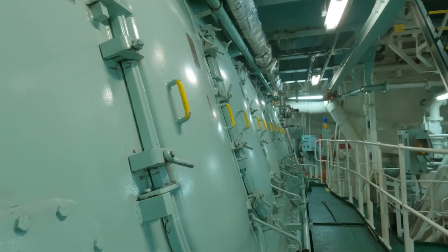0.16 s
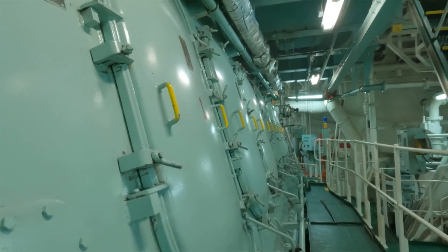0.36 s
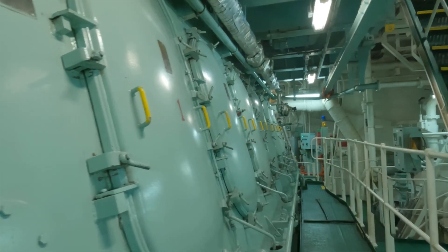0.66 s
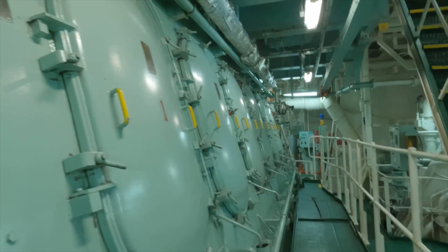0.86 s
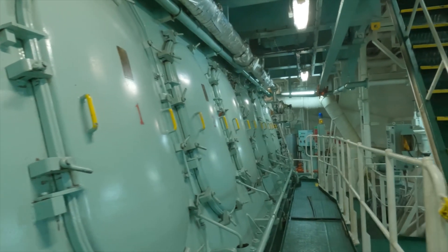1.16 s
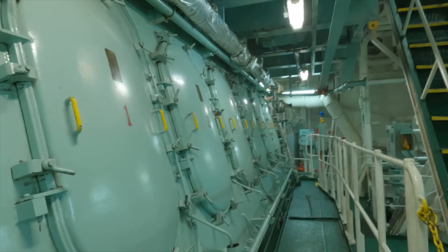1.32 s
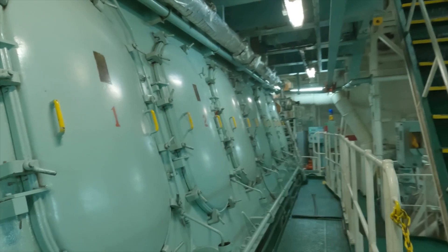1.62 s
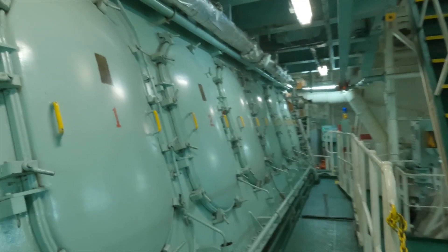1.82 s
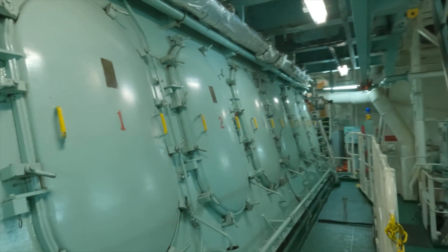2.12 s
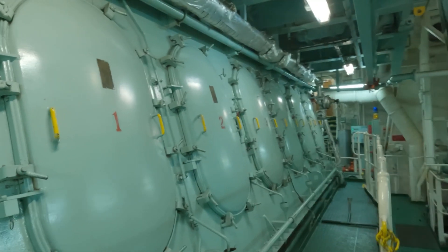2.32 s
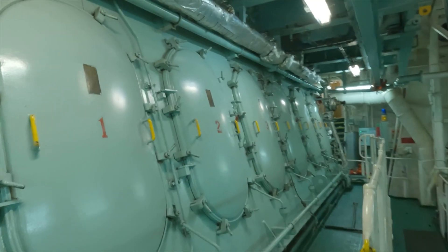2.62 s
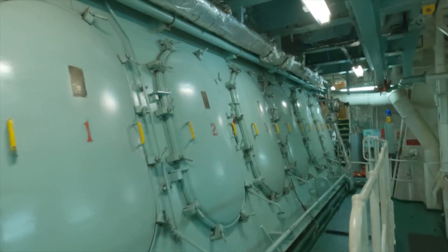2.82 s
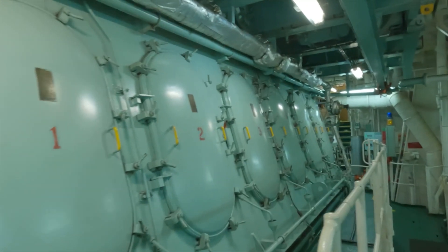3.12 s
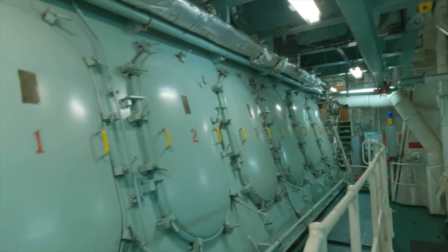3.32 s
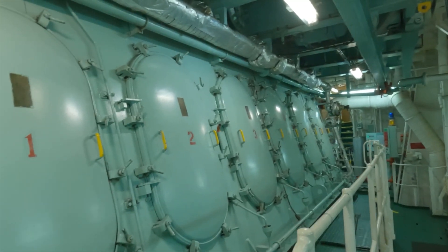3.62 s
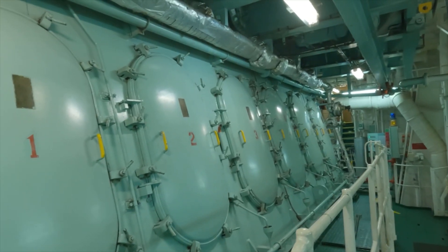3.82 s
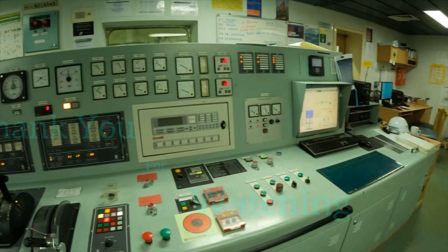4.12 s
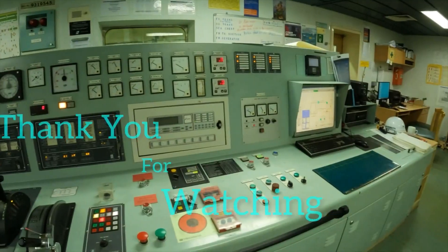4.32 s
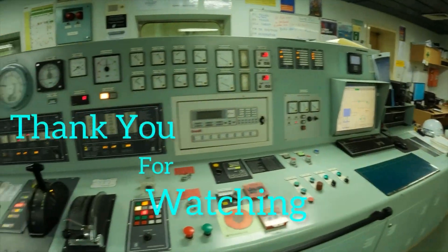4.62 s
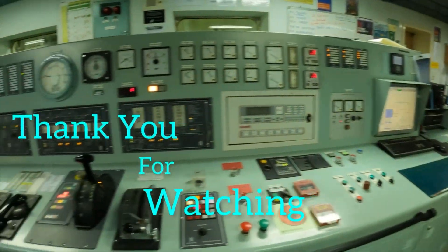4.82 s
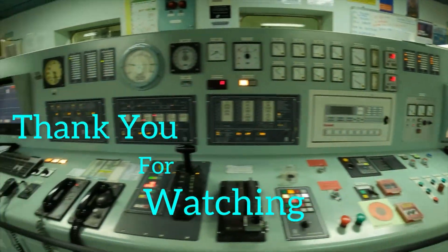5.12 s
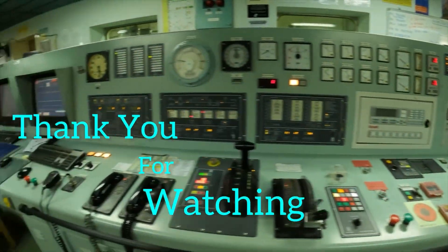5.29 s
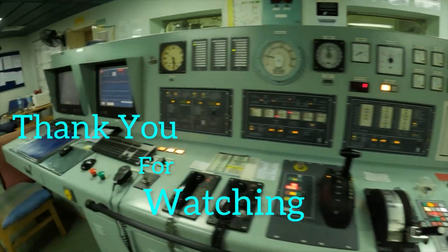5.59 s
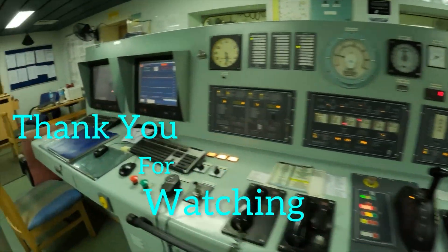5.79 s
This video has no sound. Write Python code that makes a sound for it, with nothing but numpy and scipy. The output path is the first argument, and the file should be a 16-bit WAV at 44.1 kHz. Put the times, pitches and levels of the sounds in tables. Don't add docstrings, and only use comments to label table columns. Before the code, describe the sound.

Handheld camera stereo inside a ship. Continuous machinery noise fills a steel hall, with thin gear tones, a brief fuzzy ring of a casing plate and a fluctuating blade whine. After about four and a half seconds it stops dead, two faint ticks, a very short silence, then a bassier control-room hum with steady motor tones and fine high buzz in dull hiss.

```python
import sys
import numpy as np
from scipy import signal
from scipy.fft import rfft, irfft, next_fast_len
from scipy.io import wavfile
from scipy.ndimage import uniform_filter1d, map_coordinates

SR = 44100
rng = np.random.default_rng(int(sys.argv[2]) if len(sys.argv) > 2 else 0)


def dump_mix(stems):
    frames = np.atleast_2d(stems).T
    limited = np.clip(frames, -1, 1)
    pcm = np.round(limited * 32767).astype(np.int16)
    wavfile.write(sys.argv[1], SR, pcm)


def gain_from_db(level_db):
    decades = np.asarray(level_db, float) / 20
    return 10 ** decades


N = 262395

# on [t/s], off [t/s], rise [s]
FIRST = (.3872, 4.898, .009)


def unit(x):
    return x / np.sqrt(np.mean(np.abs(x) ** 2) + 1e-20)


def along(points, hz, column=1):
    table = np.array(points, float)
    return np.interp(np.log(hz + 1), np.log(table[:, 0] + 1), table[:, column])


def curves(rows):
    s, *cols = np.transpose(rows)
    t = np.arange(N) / SR
    return [np.interp(t, s, c) for c in cols]


def wobble(rate, count=N):
    coarse = np.arange(0, count + 32, 32)
    knots = rng.standard_normal(count // 100 + 8)
    values = map_coordinates(knots, [coarse * min(rate, 400) / SR])
    return np.interp(np.arange(count), coarse, values)


def surging(layers, start):
    since = np.maximum(np.arange(N) / SR - start, 0)
    return [db + drift * since + surge_db * wobble(rate) for db, drift, surge_db, rate in layers]


def filtered(x, response):
    m = next_fast_len(N + 8192)
    spectrum = rfft(x, m) * response(np.fft.rfftfreq(m, 1 / SR))
    return irfft(spectrum, m)[..., :N]


def tone(hz, db, smear_hz, steady, count=N, lag=np.pi / 2):
    turn = 2 * np.pi * (np.cumsum(hz * np.ones(count)) / SR + rng.random())
    cos, sin = np.cos(turn), np.sin(turn)
    late = np.cos(lag) * cos + np.sin(lag) * sin
    direct = np.sqrt(np.clip(steady, 0, 1))
    echo = np.sqrt(np.clip(1 - steady, 0, 1) / 2)
    pair = []
    for arrival in (cos, late):
        reflections = wobble(smear_hz, count) * cos + wobble(smear_hz, count) * sin
        pair.append(direct * arrival + echo * reflections)
    return gain_from_db(db) * np.sqrt(2) * np.array(pair)


def din(levels, low, high, join_db, patchy_db, flutter_db):
    layer_edges = [110, 700, 1600]
    edges = [0, *layer_edges, SR]
    evenness = [.9, .7, .3, 0]

    def colour(hz):
        return gain_from_db(np.where(hz < 1500, along(low, hz), along(high, hz) + join_db))

    z = signal.stft(rng.standard_normal((2, N + 512)), nperseg=512)[2]
    field = uniform_filter1d(rng.standard_normal(z.shape[1:]), size=5, axis=0)
    field = uniform_filter1d(field, size=10, axis=1)
    noise = signal.istft(z * gain_from_db(patchy_db * unit(field)), nperseg=512)[1][:, :N]

    shared = wobble(13)
    total = 0
    for db, lo, hi, even in zip(levels, edges, edges[1:], evenness):
        def band(hz):
            below_top = 1 / (1 + (hz / hi) ** 8)
            below_bottom = 1 / (1 + (hz / (lo + 1e-3)) ** 8)
            return colour(hz) * np.sqrt(below_top - below_bottom)

        layer = filtered(noise, band)
        swell = uniform_filter1d(uniform_filter1d(layer[0] ** 2, size=2000), size=2000)
        layer = layer / np.abs(swell) ** (even / 2)
        flutter = shared + wobble(30) + 0.72 * wobble(7.2)
        total = total + gain_from_db(db + flutter_db * flutter) * unit(layer)
    return total


def engine_din():
    # level/dB, drift [dB/s], surge [dB], surges [1/s]
    layers = [
        (-39.5, -0.24, 1.5, 9),
        (-38, 0.03, 1.14, 9),
        (-46, -0.12, 1, 8),
        (-51.5, 0.02, 0.77, 8),
    ]
    # f/Hz, density [dB per Hz]
    low_colour = [(4.7, -38), (8.0, -18), (38, 6.5), (85, -2.5), (135, -6), (187, -3), (244, -5), (272, -8),
                  (361, -8.5), (403, -10.5), (572, -16), (712, -18), (1100, -14), (1500, -20.5),
                  (1950, -52), (3300, -120)]
    high_colour = [(880, -36), (1500, -9), (1720, -7.5), (1920, -11.5), (3190, -13), (3450, -14.5),
                   (3730, -17), (4810, -20), (5150, -20.5), (5570, -23), (6910, -25.5), (8820, -36),
                   (10100, -38), (15600, -54)]
    # t/s, hiss lift [dB]
    open_view = [(.4, 0), (.75, -1.8), (1.25, -0.5), (1.42, -0.5), (1.7, -0.3), (2.3, 1), (2.6, -0.2),
                 (3.05, 0.6), (3.6, 0.4), (4.1, 0.3), (4.5, -1), (4.9, 1.5)]
    *low_db, hiss_db = surging(layers, FIRST[0])
    levels = [*low_db, hiss_db + curves(open_view)[0]]
    return din(levels, low_colour, high_colour, join_db=-12.0, patchy_db=1.0, flutter_db=0.11)


def hull_hum(start):
    # level/dB, drift [dB/s], surge [dB], surges [1/s]
    layers = [
        (-35.5, 8.5, 2.5, 14),
        (-30, -1.5, 2, 9.7),
        (-44, 2, 1.7, 9),
        (-48, -0.4, .5, 23),
    ]
    # f/Hz, density [dB per Hz]
    low_colour = [(5, -47), (10, -17), (32, 15), (90, 1.5), (125, -6.5), (160, -8), (190, -14),
                  (238, -17.5), (361, -15.5), (598, -24), (667, -28), (947, -26), (1500, -26.5),
                  (3300, -120)]
    high_colour = [(880, -30), (1500, -7), (1670, -7), (1720, -9), (2220, -8.5), (2400, -9.5), (3190, -8.5),
                   (4670, -12), (6260, -14.5), (6770, -16), (9820, -21), (11200, -27), (15600, -36)]
    levels = surging(layers, start)
    return gain_from_db(-3.5) * din(levels, low_colour, high_colour, join_db=-19.0, patchy_db=0.25, flutter_db=0.1)


def ticks():
    # t/s, peak level/dB, low edge f/Hz
    tick_table = [
        (4.8888, -56, 6000),
        (4.8972, -54, 3000),
    ]
    out, t = np.zeros(N), np.arange(200) / SR
    for s, db, low_hz in tick_table:
        burst = rng.standard_normal(len(t)) * gain_from_db(db - 60 * t / .003)
        highpass = signal.butter(2, low_hz, "high", fs=SR)
        out[round(s * SR):][:len(t)] += signal.lfilter(*highpass, burst)
    return out


def gears():
    gear_hz = [81, 196, 1291, 3890, 4311, 4603, 5859, 7780, 12290]
    # level/dB, smear [Hz]
    gear_levels = [(-47, 4), (-51, 6), (-63, 5), (-82, 5), (-76, 7), (-74, 5), (-81, 7), (-91, 12),
                   (-97, 110)]
    # t/s, level/dB
    plate_levels = [(.4, -77), (.6, -50.5), (1, -50), (1.2, -65), (1.38, -45.5), (1.55, -53), (1.8, -56),
                    (2.1, -90), (4.9, -80)]
    db, = curves(plate_levels)
    plate = tone(1125, db, 45, steady=0) + tone(1020, db - 1.5, 29.75, steady=0)
    total = plate * [[1], [.4]]
    for hz, (level_db, smear_hz) in zip(gear_hz, gear_levels):
        total = total + tone(hz, level_db, smear_hz, steady=.5)
    return total


def drone():
    motor_hz = [38, 67.25, 86.57, 134.5, 149, 177.3, 204.5, 269.2, 403.5, 437, 592, 755, 920, 976, 1236,
                1308, 1393, 1644, 2149, 5021, 6455]
    # level/dB, smear [Hz]
    motor_levels = [(-38, 3), (-37, 2), (-35, 2), (-34.5, 2.5), (-41, 3), (-39, 2), (-46, 9), (-46.5, 3),
                    (-51, 3), (-55, 4), (-55, 6), (-58, 6), (-59, 6), (-55.5, 5), (-61, 6), (-60, 6),
                    (-57.5, 5), (-60, 5), (-64, 5), (-78, 6), (-75, 6)]
    # f/Hz, level/dB
    rotor_levels = [(2500, -77), (4000, -79), (5500, -77), (8000, -96), (9800, -84.5), (11400, -84.5),
                    (12500, -99)]
    strong = [32, 33, 37, 39, 63, 106, 108, 110, 113, 114, 116, 121, 125, 126, 128, 132, 142]
    rotor_hz, lift_db = 86.57, 6
    count = round(1.0 * SR)
    total = 0
    for hz, (level_db, smear_hz) in zip(motor_hz, motor_levels):
        total = total + tone(hz, level_db, smear_hz, .9 if hz < 200 else .7, count)
    for k in [*strong[:5], *range(98, 144)]:
        level_db = along(rotor_levels, k * rotor_hz) + lift_db * (k in strong)
        total = total + tone(k * rotor_hz, level_db, 9.8, 0.64, count)
    return np.pad(total, ((0, 0), (N - count, 0)))


def overtone_levels():
    overtones = [
        (-69, .5, 1.5),
        (-78, 1.8, 1.5),
        (-79, 1.5, 1.5),
    ]
    # t/s, lift [dB]
    loud_spots = [
        [(.54, 5), (1.38, 2), (1.7, 6.5), (2.1, 5), (2.4, 6), (2.94, 6), (3.85, 8), (4.15, 7.5), (4.6, 4)],
        [(1.24, 7), (1.72, 6), (2.3, 10), (2.7, 8), (3.05, 7), (3.6, 3), (3.8, 2), (4.42, 1), (4.8, 6)],
        [(.72, 6), (1.68, 4), (2.7, 5), (3.06, 8), (3.42, 5), (4.14, 2), (4.4, 5), (4.62, 6)],
    ]
    fades_per_s, spot_s = 6, 0.11
    t = np.arange(N) / SR
    base = surging([(*row, fades_per_s) for row in overtones], FIRST[0])
    levels = []
    for db, spots in zip(base, loud_spots):
        lift = sum(lift_db * np.exp(-((t - s) / spot_s) ** 2) for s, lift_db in spots)
        levels.append(db + lift)
    return levels


def blower():
    # t/s, blade-pass f/Hz
    blade_pass = [(.4, 1683.5), (1.05, 1680.5), (1.5, 1679), (2.25, 1675.5), (3.2, 1673.5), (3.85, 1674.5),
                  (4.9, 1674)]
    # t/s, level/dB
    blade_levels = [(.42, -57.5), (.95, -58), (1.04, -65), (1.2, -55), (1.5, -61), (1.86, -51), (2.0, -64),
                    (2.3, -68), (2.46, -48.5), (2.65, -62), (3.04, -51.5), (3.17, -62), (3.3, -55),
                    (3.62, -58), (4.0, -54.5), (4.26, -53.5), (4.62, -52), (4.88, -51.5)]
    # multiple, level/dB, smear [Hz]
    top = [
        (5, -89, 24),
        (6, -85.5, 45),
        (5.95, -82, 360),
        (7, -90.5, 60),
        (7.05, -93, 380),
        (1.52, -62.5, 380),
    ]
    hz, = curves(blade_pass)
    steady = [.93, .8, .65, .6]
    sideways_db = [-53, -63, -73, -73]
    total = 0
    for k, db in enumerate(curves(blade_levels) + overtone_levels()):
        direct_db = np.maximum(db, sideways_db[k] - 7)
        across_db = .3 * db + .7 * sideways_db[k]
        both_db = np.array([direct_db, across_db])
        total = total + tone((k + 1) * hz, both_db, 9 + 4 * k, steady[k], lag=1.05)
    for multiple, db, smear_hz in top:
        total = total + tone(multiple * hz, db, smear_hz, steady=0.037)
    return total


def ports(pair, table):
    def response(hz):
        apart = hz ** 2 / (hz ** 2 + 200 ** 2)
        turn = apart * np.arccos(np.clip(along(table, hz), 0, 1)) / 2
        balance = gain_from_db(apart * along(table, hz, column=3) / 2)
        lead = np.exp(.5j * apart * along(table, hz, column=2))
        tilt = balance * lead
        left = [np.cos(turn) * tilt, np.sin(turn) * tilt]
        right = [np.cos(turn) / tilt, -np.sin(turn) / tilt]
        return np.array([left, right])
    return filtered(pair, response).sum(axis=1)


def gate(on, off, rise):
    t = np.arange(N) / SR
    return np.clip((t - on) / rise, 0, 1) * np.clip((off - t) / .0008, 0, 1)


def scene():
    # on [t/s], off [t/s], rise [s]
    second = (4.9585, 6.2, .014)
    # f/Hz, likeness [0-1], left lead [rad], left-right level/dB
    first_ports = [(160, 1, 0, 0), (413, 0.99, 0.28, .5), (866, 0.85, 0.041, 2.5), (1500, 0.88, 0.61, 2),
                   (2770, 0.64, 0.23, 1.4), (4300, 0.67, 0.28, 0.5), (5500, 0.8, -.07, 0.5),
                   (8400, 0.43, -.08, 4), (10400, 0.56, 0, 5), (10950, 0.7, 0, 0), (11600, .3, 0, 5),
                   (12200, 0.2, 0.061, 11), (15000, 0.2, 0, 14)]
    second_ports = [(150, 1, 0, -0.5), (400, 1, -0.13, 1), (860, 0.92, 0.21, 3), (1500, 0.8, 0.19, 3.5),
                    (2800, 0.74, .38, 2.3), (4300, 0.75, .52, 2), (5500, 0.65, .27, 1),
                    (7700, 0.81, .08, 0), (11000, .45, -.1, 3.5), (12000, .2, 0, 8), (15300, 0.62, 0, 5)]
    engine_room = engine_din() + gears() + blower()
    hum_room = hull_hum(second[0]) + drone()
    heard_first = ports(engine_room, first_ports) * gate(*FIRST)
    heard_second = ports(hum_room, second_ports) * gate(*second)
    return heard_first + heard_second + ticks()


def top_cut(x):
    return signal.sosfilt(signal.butter(12, 15710, fs=SR, output="sos"), x)


def record(dry):
    return top_cut(dry)


dry = scene()
out = record(dry)
dump_mix(out)
```